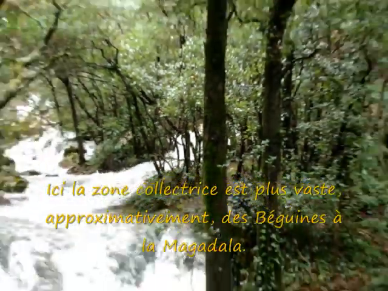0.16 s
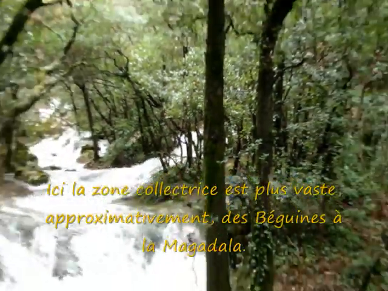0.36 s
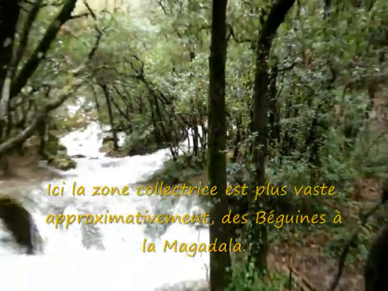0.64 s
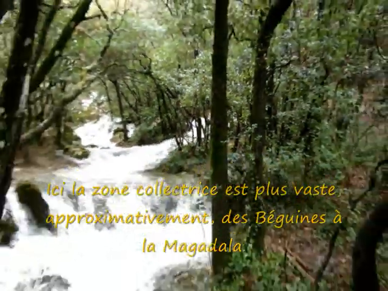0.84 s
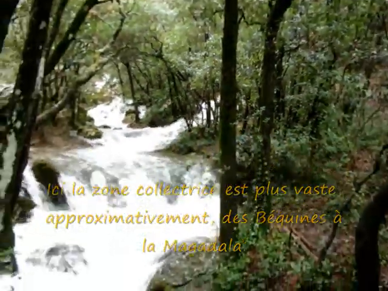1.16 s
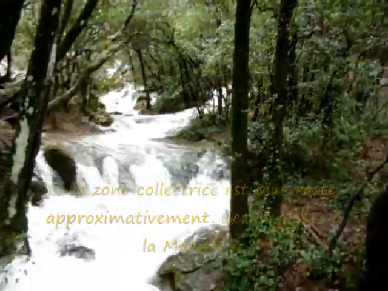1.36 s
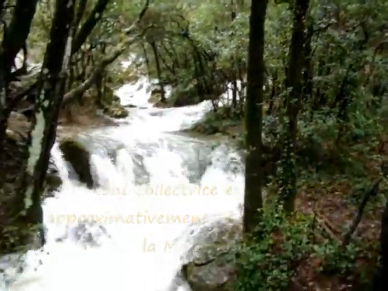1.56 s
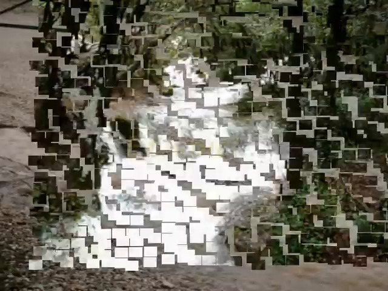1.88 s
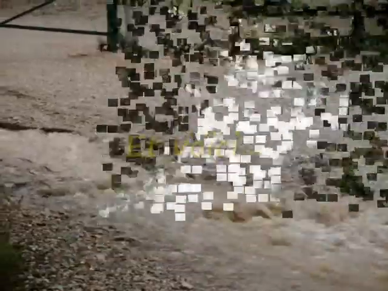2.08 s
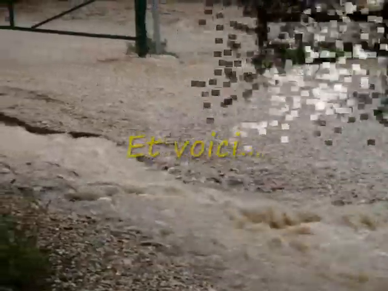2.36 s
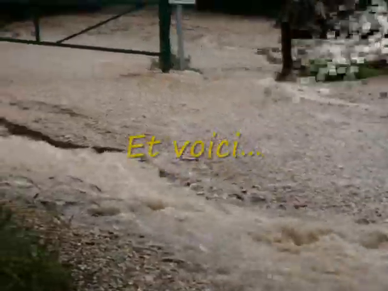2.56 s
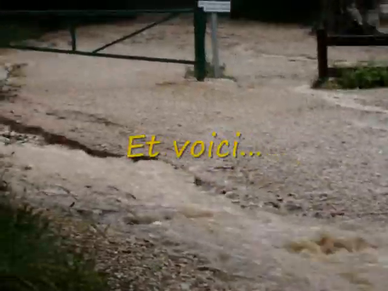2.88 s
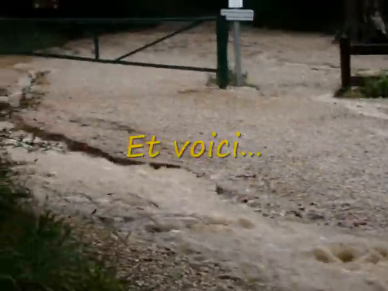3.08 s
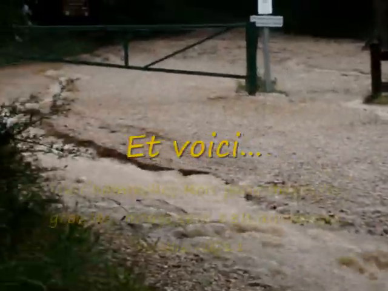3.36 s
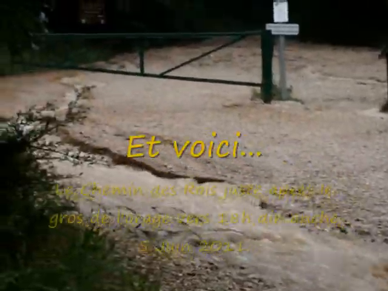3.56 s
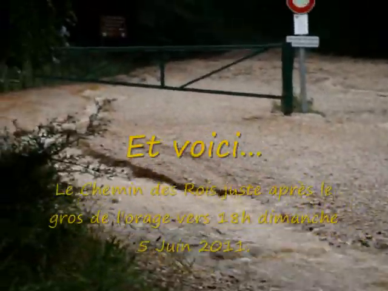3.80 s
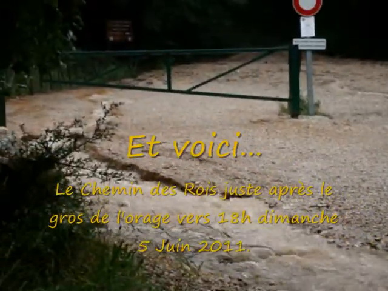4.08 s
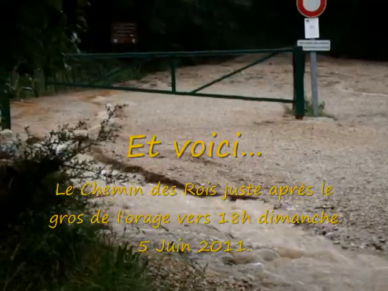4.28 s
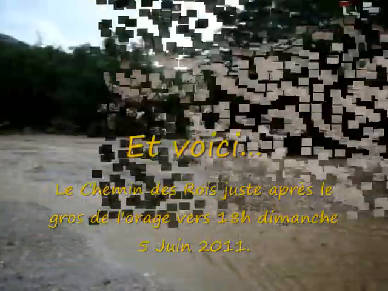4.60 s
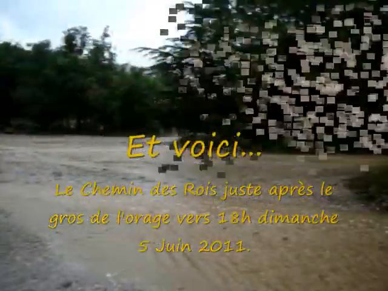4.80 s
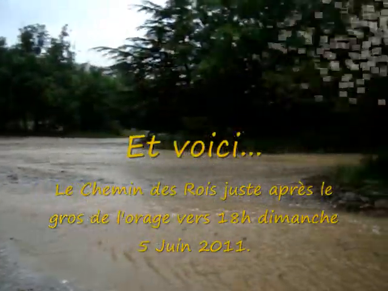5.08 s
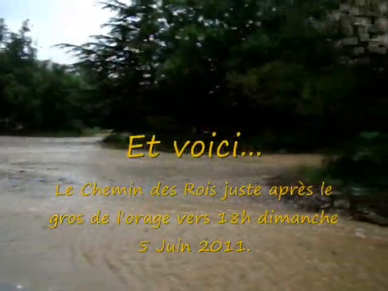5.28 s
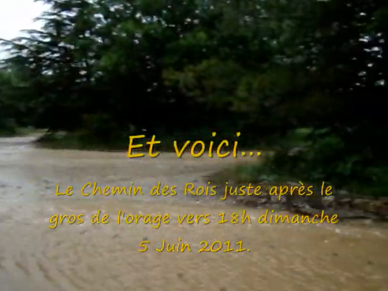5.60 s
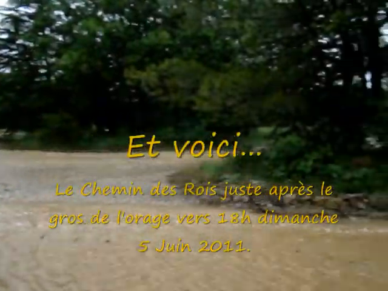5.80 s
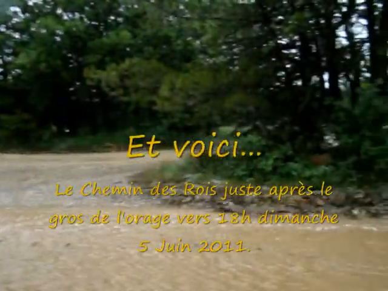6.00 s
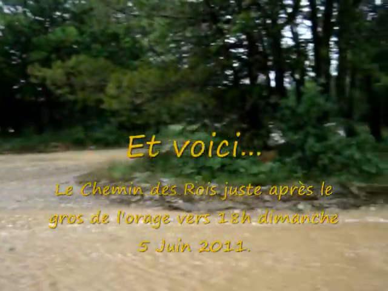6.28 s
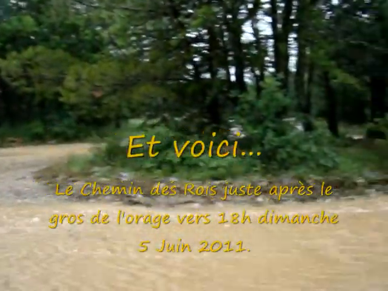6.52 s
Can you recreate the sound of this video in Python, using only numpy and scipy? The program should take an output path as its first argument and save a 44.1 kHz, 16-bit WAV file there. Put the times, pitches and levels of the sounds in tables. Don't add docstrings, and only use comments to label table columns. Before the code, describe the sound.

Three outdoor water scenes blend into each other. First a steady, bright white-water rush at close range. Then muddy water pulsing gently over gravel at arm's length, hissing and gurgling while individual drops plop and tick. Last, a softer muffled flow farther off with a few near splashes and low, irregular wind buffets. The sound is from a small handheld microphone, nearly mono, with slightly degraded treble.

```python
import sys
import numpy as np
from scipy import signal
from scipy.io import wavfile

SR = 44100
rng = np.random.default_rng(int(sys.argv[2]) if len(sys.argv) > 2 else 0)


def pcm_store(signal):
    levels = np.round(np.clip(np.atleast_2d(signal), -1, 1) * 32767)
    wavfile.write(sys.argv[1], SR, levels.astype(np.int16).T)


def invert_db(level):
    return 10 ** (np.asarray(level, dtype=float) / 20)


N = 293265


def rms_one(x):
    return x / np.sqrt(np.mean(x ** 2) + 1e-20)


def bandpass(x, order, low_hz, high_hz):
    return signal.sosfilt(signal.butter(order, [low_hz, high_hz], "band", fs=SR, output="sos"), x)


def bandpass_centred(x, order, low_hz, high_hz):
    return signal.sosfiltfilt(signal.butter(order, [low_hz, high_hz], "band", fs=SR, output="sos"), x)


def highpass(x, order, hz):
    return signal.sosfilt(signal.butter(order, hz, "high", fs=SR, output="sos"), x)


def at_hz(points, hz):
    point_hz, point_db = np.transpose(points)
    return np.interp(np.log(hz), np.log(point_hz), point_db)


def slow_drift(rate_hz):
    r = np.exp(-80 * np.pi * rate_hz / SR)
    settle = 2000
    noise = rng.standard_normal(N // 40 + 2 + settle)
    return rms_one(signal.lfilter([1], [1, -2 * r, r * r], noise)[settle:])


def filled(slow):
    return np.interp(np.arange(N) / 40, np.arange(len(slow)), slow)


def rush(colour, span, surge_db, flicker_db, flicker_rate, tilt_db=0):
    edges = 22 * 2 ** (np.arange(28) / 3)
    white = rng.standard_normal((2, N))
    surge = slow_drift(24)
    out = np.zeros(N)
    heard = slice(round(span[0] * SR), round(span[1] * SR))
    for k, (low, high) in enumerate(zip(edges, edges[1:])):
        hz = min(np.sqrt(low * high), 9800)
        band = bandpass(white[k % 2, heard], 2, low, high)
        spray = np.clip(np.log2(hz / 1500) / 2, 0, 1)
        level_db = at_hz(colour, hz) + spray * (tilt_db + surge_db * surge)
        level_db = level_db + flicker_db * slow_drift(flicker_rate)
        out[heard] += band * filled(invert_db(level_db))[heard]
    out[heard] = rms_one(out[heard])
    return out


def bubbles(s, level_db, hz, cycles, rise):
    t = np.arange(1400)[None, :] / SR
    hz, cycles, rise = hz[:, None], np.maximum(cycles, .5)[:, None], rise[:, None]
    turns = hz * t
    swell = 1 - np.exp(-2.5 * turns)
    decay = invert_db(-60 * turns / cycles)
    tone = np.sin(2 * np.pi * turns * (1 + rise * turns))
    sound = invert_db(level_db)[:, None] * swell * decay * tone
    out = np.zeros(N + t.size)
    np.add.at(out, (s * SR).astype(int)[:, None] + np.arange(t.size), sound)
    return out[:N]


def gurgle(span, count, centre_hz, octaves, size_db, cycles):
    draw, scatter = rng.random((count, 4)), rng.standard_normal(count)
    s = span[0] + (span[1] - span[0]) * draw[:, 0]
    hz = np.clip(centre_hz * 2 ** (octaves * scatter), 350, 9800)
    size = size_db * np.minimum(-np.log(1 - draw[:, 1]), 3)
    size += 5 * np.minimum(np.log2(hz / centre_hz), 0)
    out = bubbles(s, size, hz, cycles * (.5 + draw[:, 2]), 0.044 * draw[:, 3])
    return rms_one(out) * np.sqrt((span[1] - span[0]) * SR / N)


# (frequency [Hz], level per Hz [dB])
WIND_COLOUR = [(25, -29), (60, -16.5), (170, -15.5), (250, -4), (330, -0.5), (450, -6.5), (700, -10.5),
               (1500, -38.5)]
# (arrival [s], hold [s], level [dB])
GUSTS = [
    (5.203, .03, -30.5),
    (5.41, 0.26, -28.5),
    (5.78, .02, -30),
    (5.87, 0.074, -30.5),
    (6.198, .02, -29.5),
    (6.325, .04, -28.5),
    (6.64, .05, -30),
]


def wind():
    rise_db_per_s, fall_db_per_s = 67, 64
    t = np.arange(N) / SR
    level_db = -37 + 20 * np.minimum(t - 5, 0)
    for s, hold, db in GUSTS:
        before, after = np.maximum(s - t, 0), np.maximum(t - s - hold, 0)
        level_db = np.maximum(level_db, db - rise_db_per_s * before - fall_db_per_s * after)
    level = invert_db(level_db + .5 * filled(slow_drift(25)))
    return level * rush(WIND_COLOUR, (FADES[1][0], N / SR), surge_db=-3, flicker_db=1.0, flicker_rate=18)


# (frequency [Hz], level per Hz [dB])
SHEET_COLOUR = [(30, -37), (150, -7.5), (400, -5), (800, -4.5), (1300, -5.5), (2500, -10), (4500, -17),
                (5600, -20.5), (7500, -24), (10000, -25.5)]


def far_sheet():
    swell_db_per_s = 1.1
    level_db = -30 + swell_db_per_s * np.maximum(np.arange(N) / SR - FADES[1][1], 0)
    hiss = rush(SHEET_COLOUR, (FADES[1][0], N / SR), surge_db=0.0, flicker_db=1.56, flicker_rate=17,
                tilt_db=0.8)
    babble = gurgle((4.4, 6.64), count=500, centre_hz=1700, octaves=.8, size_db=4.0, cycles=10)
    return invert_db(level_db) * (hiss + invert_db(-10.5) * babble)


# (frequency [Hz], level per Hz [dB])
TORRENT_COLOUR = [(18, -96), (30, -59), (59, -48), (94, -25), (114, -16), (168, -20), (260, -8.5),
                  (393, -9), (565, -1.5), (1110, -3), (2000, -2), (9200, -9), (9900, -8), (12900, -37),
                  (21800, -120)]


def torrent():
    roar = rush(TORRENT_COLOUR, (0, FADES[0][1]), surge_db=0.1, flicker_db=0.68, flicker_rate=11)
    fizz = gurgle((0, 2.9), count=2500, centre_hz=1810, octaves=1.0, size_db=5.0, cycles=12.4)
    water = invert_db(-19) * (invert_db(0.92) * roar + invert_db(-17.5) * fizz)
    return highpass(water, 3, 80)


# (frequency [Hz], level per Hz [dB])
RUN_COLOUR = [(30, -38), (140, -15), (210, -15.5), (280, -9), (440, -9.5), (650, -4), (1050, -7),
              (1600, -2), (2300, -6), (3800, -10), (5000, -12.5), (6400, -10.5), (8000, -16), (9900, -16.5)]
# (time [s], level [dB])
RUN = [
    (2.4, -30),
    (2.7, -30),
    (3.1, -32),
    (3.45, -30.5),
    (3.68, -32.5),
    (4.0, -30.5),
    (4.28, -32),
    (4.6, -31.5),
    (5.1, -30),
]


def gravel_run():
    pulse_s, pulse_db = np.transpose(RUN)
    level_db = np.interp(np.arange(N) / SR, pulse_s, pulse_db)
    hiss = rush(RUN_COLOUR, (FADES[0][0], FADES[1][1]), surge_db=1.0, flicker_db=0.97, flicker_rate=17,
                tilt_db=-1.4)
    babble = gurgle((1.9, 5.45), count=900, centre_hz=1513, octaves=0.616, size_db=2.0, cycles=14.5)
    crackle = gurgle((1.9, 5.45), count=700, centre_hz=6500, octaves=.45, size_db=2.5, cycles=18.0)
    return invert_db(level_db + 6.0) * (hiss + invert_db(-7.5) * babble + invert_db(-15) * crackle)


def singles(rows, cycles, rise):
    s, level_db, hz = np.transpose(rows)
    return bubbles(s, level_db, hz, np.full(len(s), cycles), np.full(len(s), rise))


# (time [s], peak [dB], centre [Hz])
TICKS = [(2.9016, -21, 5000), (2.9834, -26, 6400), (3.1092, -19, 5600), (3.119, -20, 6500),
         (3.1292, -19, 7000), (3.1294, -21, 9600), (3.2554, -23, 6300), (3.7836, -24, 6500),
         (3.876, -12.5, 5900), (4.028, -13.5, 5600), (4.689, -23, 6300), (5.441, -24, 5500),
         (5.5441, -32, 5200), (5.9507, -35, 4500), (6.017, -23, 9000), (6.0885, -24, 4800),
         (6.3453, -27, 4500)]


def splash_ticks():
    t60_s, spread = 0.011, 1.34
    out, t = np.zeros(N), np.arange(500) / SR
    for (s, db, hz), noise in zip(TICKS, rng.standard_normal((len(TICKS), t.size))):
        burst = bandpass(noise * invert_db(-60 * t / t60_s), 2, hz / spread, min(hz * spread, 12000))
        out[round(s * SR):][:t.size] += invert_db(db - 2.0) * burst / np.abs(burst).max()
    return out


# (time [s], peak [dB], pitch [Hz])
DROPS = [(2.31, -11, 1460), (2.451, -5.5, 1460), (2.7785, -9, 1170), (2.9163, -13.5, 1170),
         (2.9263, -8, 2480), (2.9852, -6, 2480), (3.2562, -9, 4170), (4.0127, -9, 2480),
         (4.0744, -13, 1980), (4.186, -12, 1700), (4.3213, -10, 2670), (4.4703, -14, 1270),
         (4.5195, -12, 1260), (4.614, -11, 1690), (4.818, -11, 2880), (4.9239, -12, 1950),
         (5.0803, -15, 1010), (5.5227, -20, 1580), (5.6281, -24, 1170), (5.9704, -15, 2480),
         (6.0892, -7, 1600), (6.1185, -7.5, 1090), (6.1235, -13, 2300), (6.1883, -15, 2670),
         (6.3935, -15, 3350)]


def plopping_drops():
    return singles(DROPS, cycles=8.9, rise=0.019)


# (time [s], peak [dB], pitch [Hz])
BUBBLES = [(2.8076, -15, 1180), (2.8087, -10, 3040), (2.8535, -10, 1300), (2.9033, -12, 4170),
           (2.9114, -14, 527), (2.928, -11, 1690), (3.0095, -14, 2670), (3.0554, -18, 930),
           (2.895, -24, 333), (3.2561, -13, 1830), (3.3892, -17, 480), (3.4067, -12, 1700),
           (3.4136, -23, 470), (3.4717, -12, 1560), (3.6247, -16.5, 704), (3.7301, -14, 2310),
           (3.85, -14, 990), (3.9011, -11.5, 597), (3.9937, -14, 1700), (4.012, -13, 1070),
           (4.054, -14, 4230), (4.1871, -11, 1080), (4.3555, -19, 596), (4.3933, -23, 305),
           (4.4404, -13, 2860), (4.881, -18, 2820), (5.0526, -17, 1890), (5.2136, -23, 636),
           (3.77, -21, 473), (6.3543, -15.5, 925)]


def ringing_bubbles():
    return singles(BUBBLES, cycles=21, rise=0.029)


# (start [s], end [s])
FADES = [
    (1.98, 3.05),
    (4.45, 5.486),
]


def scene():
    t = np.arange(N) / SR
    first, second = (np.clip((t - a) / (b - a), 0, 1) for a, b in FADES)
    near = ringing_bubbles() + plopping_drops() + splash_ticks()
    water = (1 - first) * torrent() + first * (1 - second) * gravel_run() + second * far_sheet()
    mix = water + wind() * (second > 0)
    return np.tile(mix + near, (2, 1))


def around(s, size):
    return slice(round(s * SR) - size // 2, round(s * SR) + size // 2)


def drop_patches(x, rows, half_s, depth):
    out, t = x.copy(), np.arange(-1300, 1300) / SR
    for s, low_hz, high_hz in rows:
        near = around(s, t.size)
        patch = bandpass_centred(out[near], 3, low_hz, high_hz)
        out[near] -= depth * patch * np.exp(-(t / half_s) ** 4)
    return out


def stray_dropouts(x):
    early, width_hz = 1.6, 640
    stray = rng.random((320, 2)) ** [early, 1] * [N / SR - .1, 4700] + [.05, 4600]
    return drop_patches(x, [(s, hz, hz + width_hz) for s, hz in stray], half_s=0.0026, depth=1)


# (time [s], low [Hz], high [Hz])
DROPOUTS = [
    (3.101, 5300, 7000),
    (3.153, 5900, 7200),
    (3.143, 9600, 10400),
    (3.16, 9300, 10400),
    (3.175, 9700, 10400),
    (6.007, 7500, 10400),
    (6.029, 7500, 10400),
    (6.109, 4900, 6000),
]


def splash_dropouts(x):
    return drop_patches(x, DROPOUTS, half_s=0.0055, depth=0.9)


# (time [s], low [Hz], high [Hz])
NOISE_FILLS = [
    (0.85, 5600, 7700),
    (1.035, 4100, 7000),
    (3.29, 6900, 8400),
    (5.89, 5200, 6400),
    (6.61, 7600, 9100),
]


def noise_fill(x):
    side, t = np.zeros(N), np.arange(-1300, 1300) / SR
    for (s, low_hz, high_hz), noise in zip(NOISE_FILLS, rng.standard_normal((len(NOISE_FILLS), t.size))):
        near = around(s, t.size)
        level = np.std(bandpass_centred(x[near], 6, low_hz, high_hz)) * invert_db(-3.5)
        hiss = rms_one(bandpass_centred(noise, 6, low_hz, high_hz))
        side[near] = level * hiss * np.exp(-(t / 0.017) ** 4)
    return side


def band_limit(x):
    return signal.sosfilt(signal.butter(12, 11210, fs=SR, output="sos"), x)


def record(dry):
    x = .8 * np.tanh(dry[0] / .8)
    x = highpass(x, 2, 50)
    x = highpass(x, 2, 45)
    x = splash_dropouts(stray_dropouts(x))
    x = signal.sosfilt(signal.ellip(14, .3, 85, 10030, fs=SR, output="sos"), x)
    return band_limit(x + noise_fill(x) * [[1], [-1]])


dry = scene()
out = record(dry)
pcm_store(out)
```